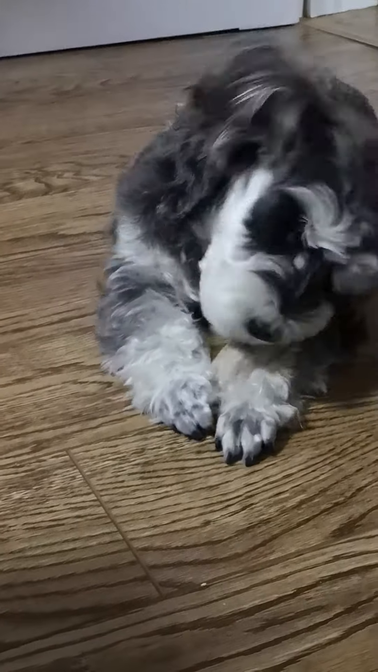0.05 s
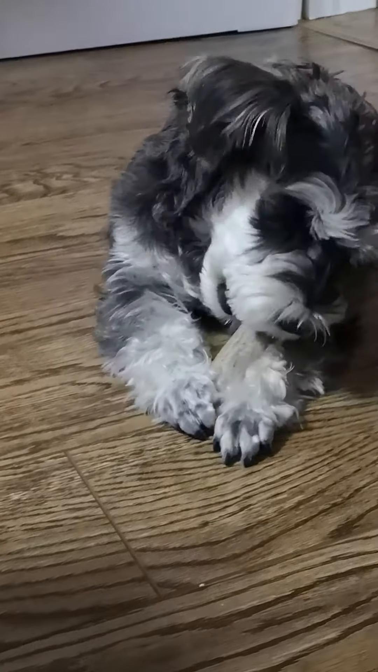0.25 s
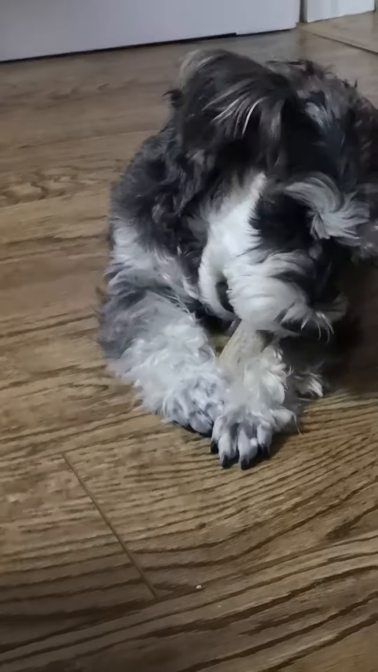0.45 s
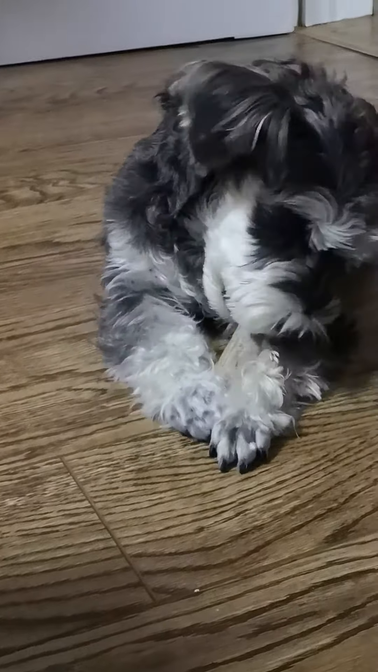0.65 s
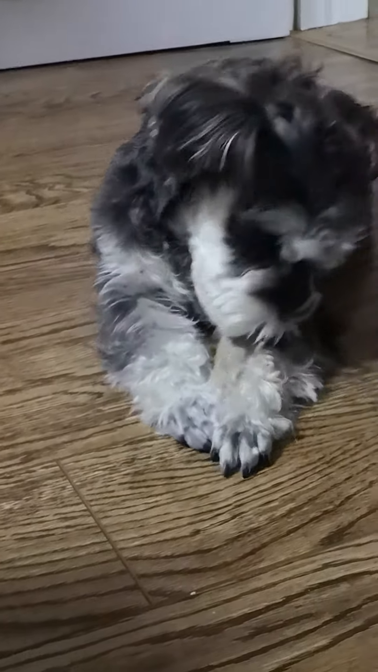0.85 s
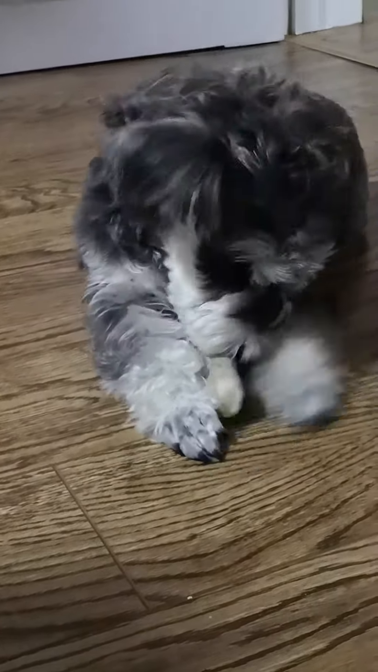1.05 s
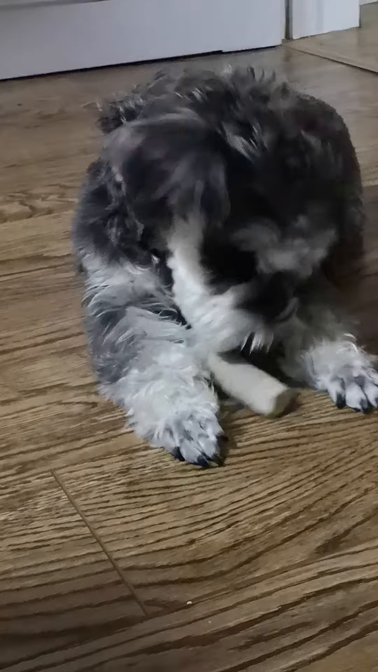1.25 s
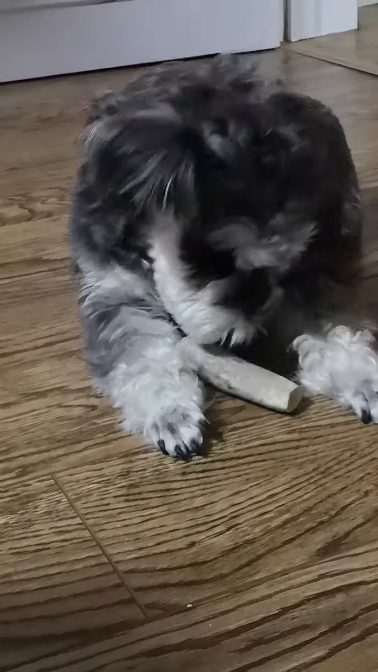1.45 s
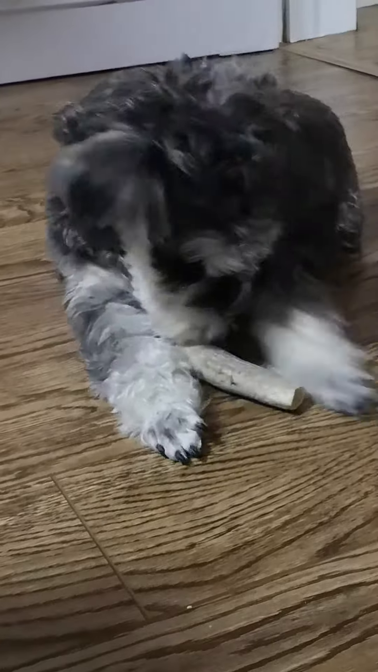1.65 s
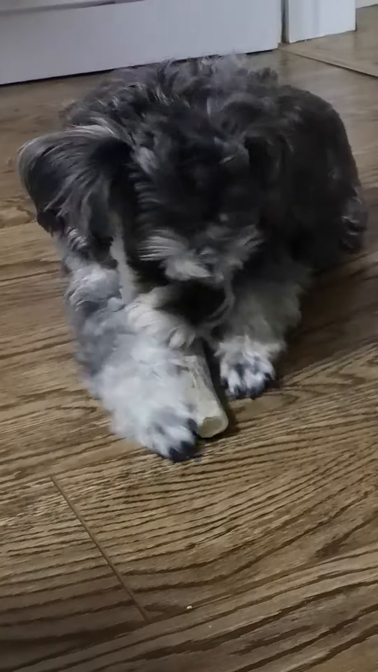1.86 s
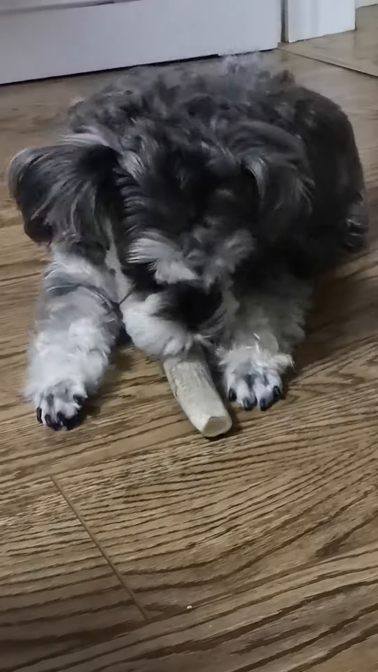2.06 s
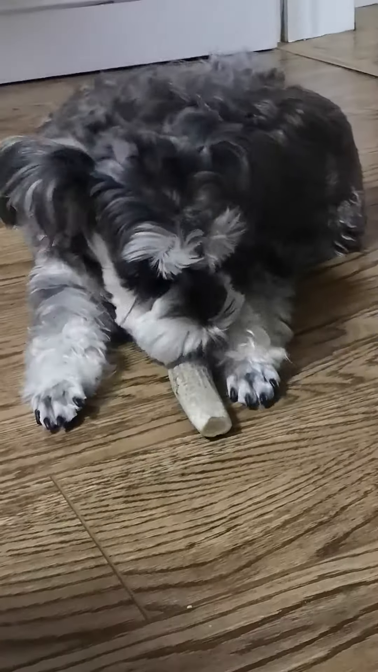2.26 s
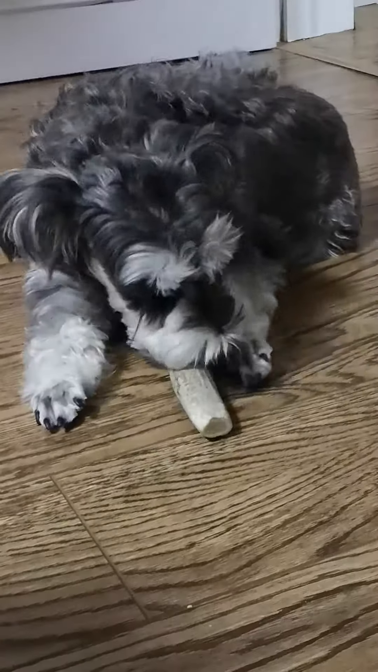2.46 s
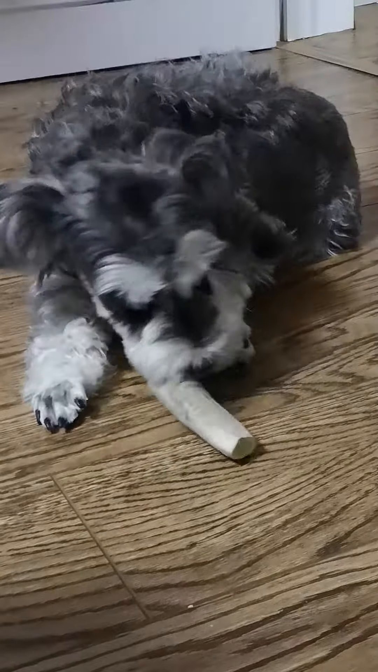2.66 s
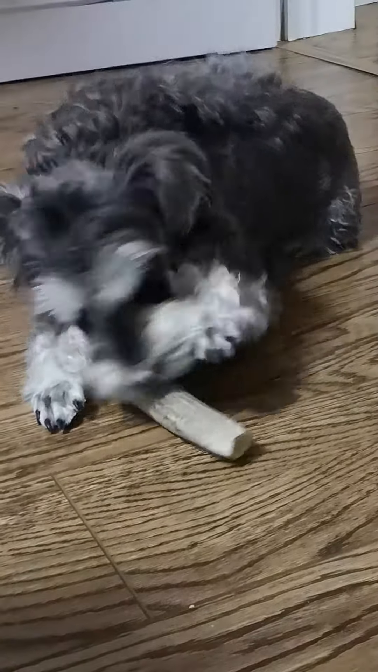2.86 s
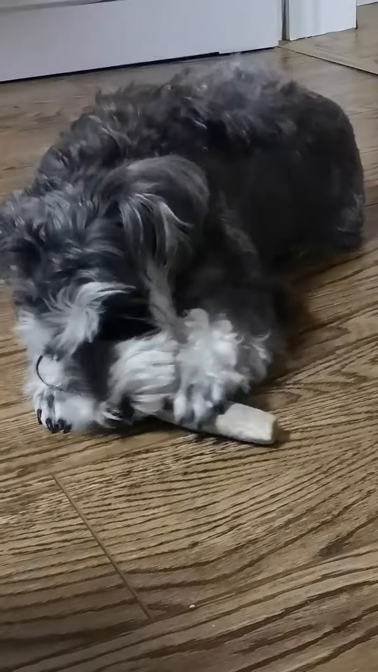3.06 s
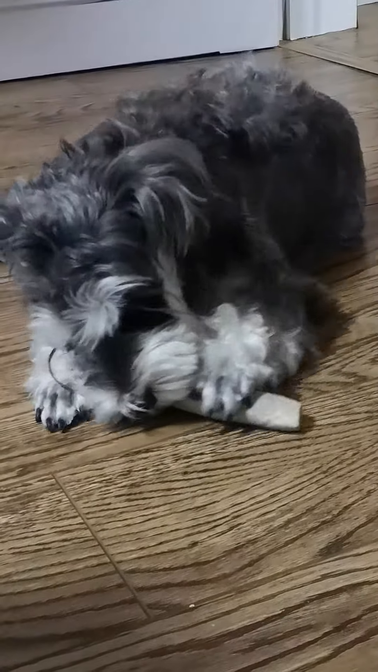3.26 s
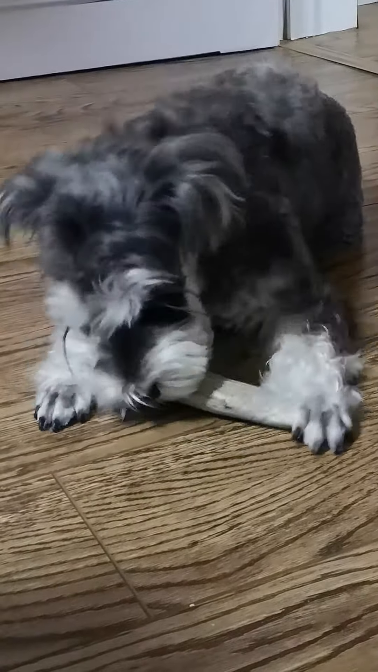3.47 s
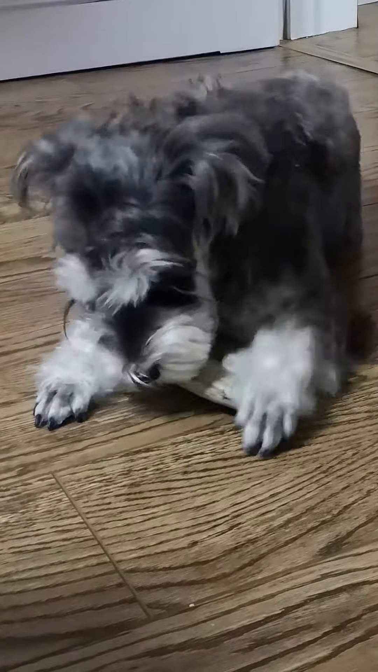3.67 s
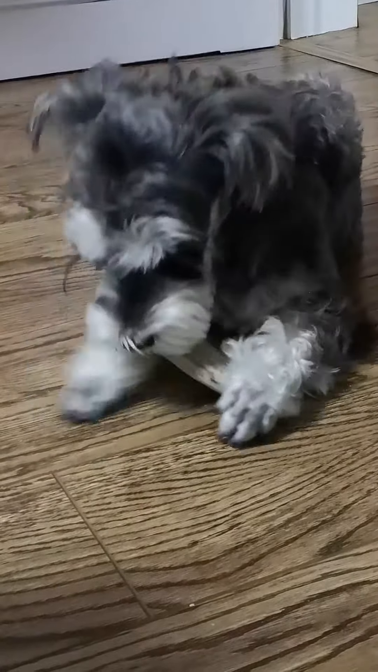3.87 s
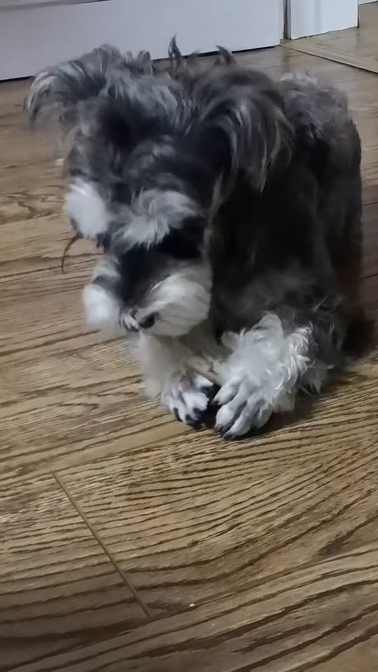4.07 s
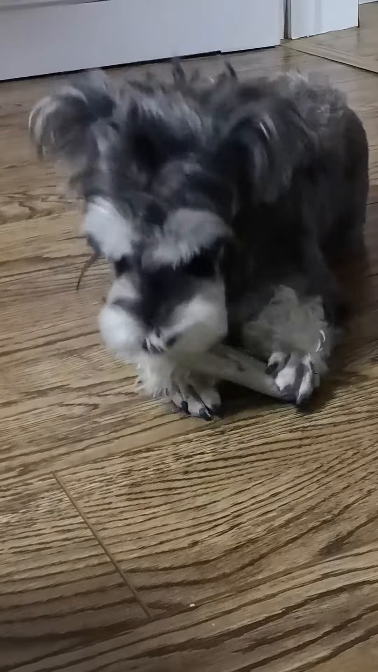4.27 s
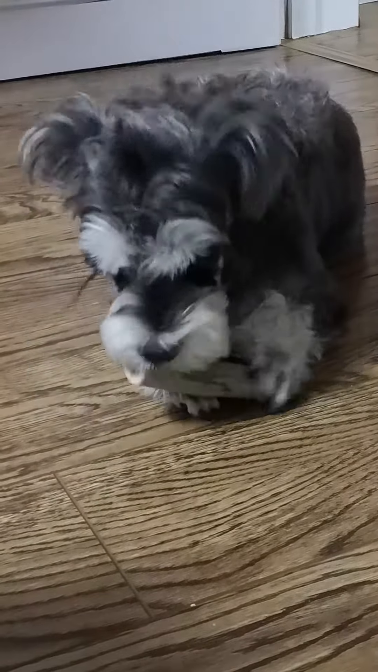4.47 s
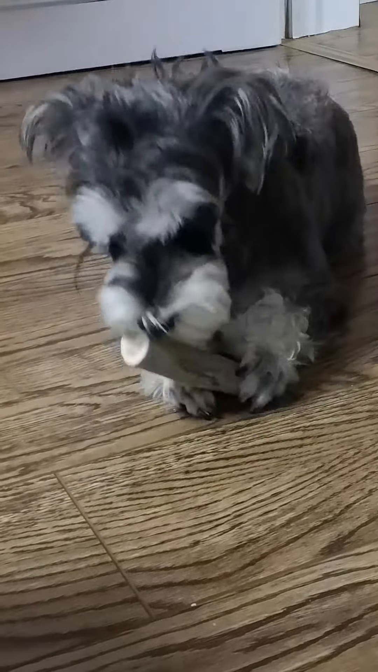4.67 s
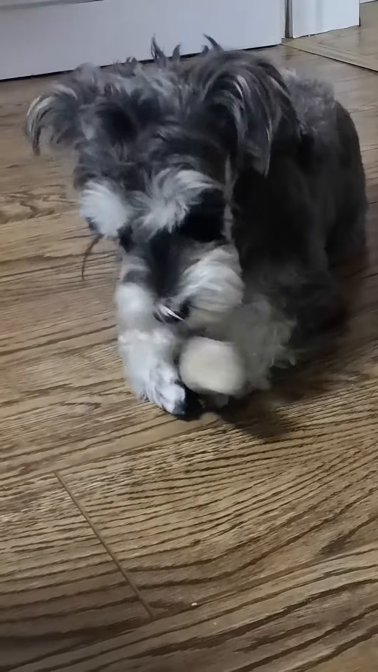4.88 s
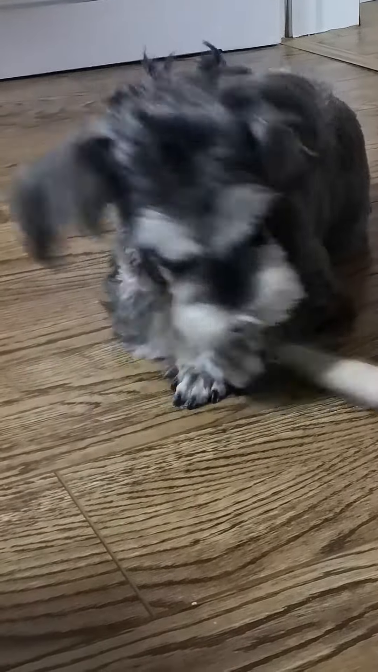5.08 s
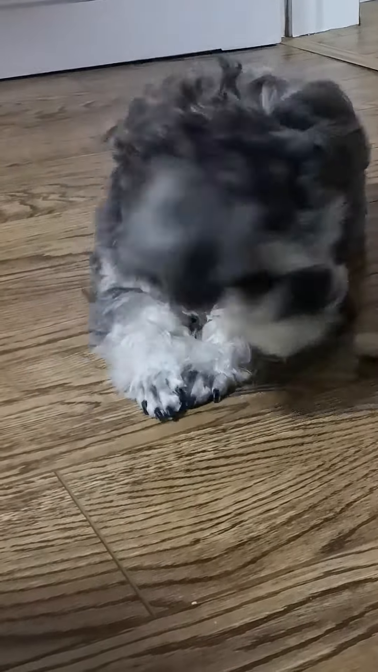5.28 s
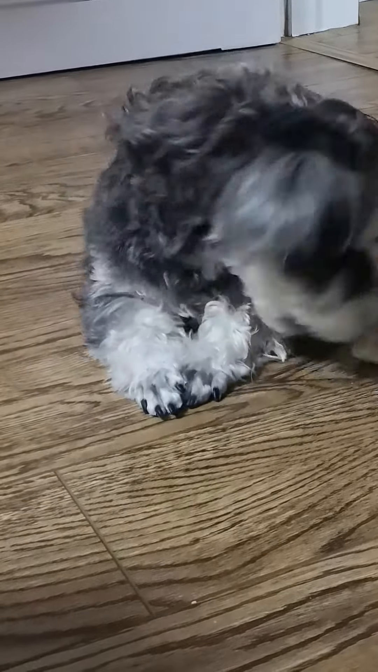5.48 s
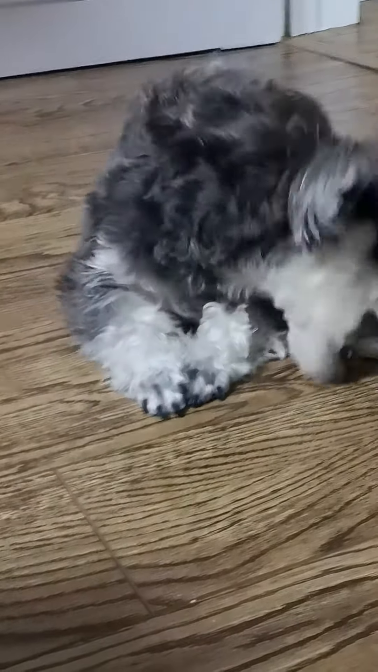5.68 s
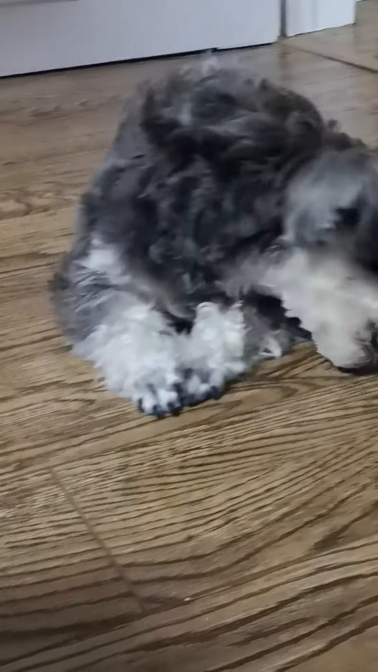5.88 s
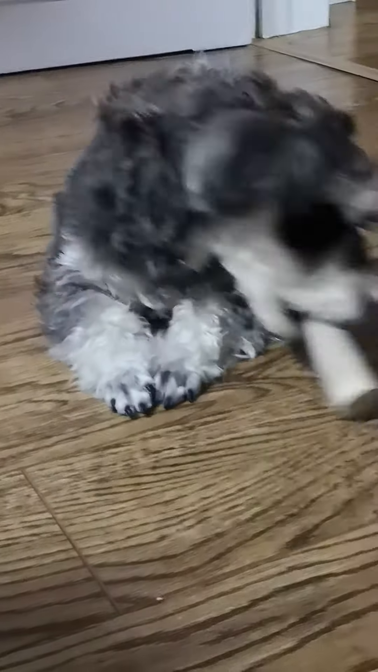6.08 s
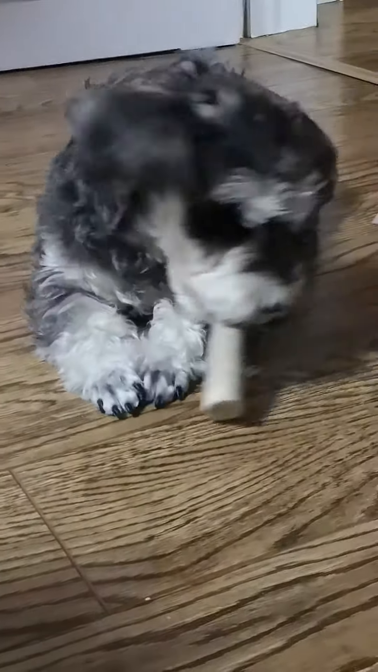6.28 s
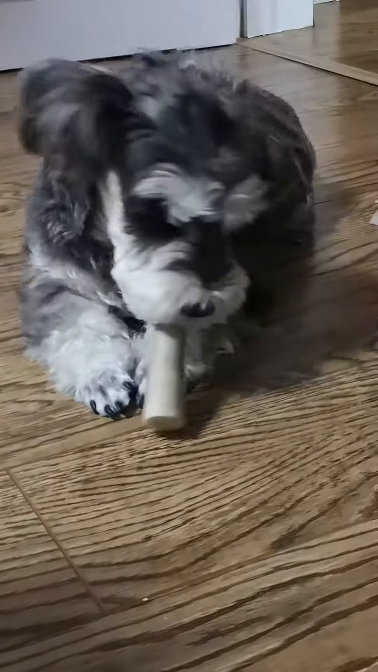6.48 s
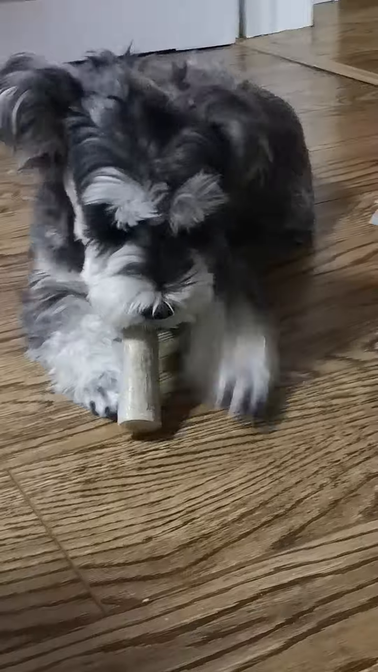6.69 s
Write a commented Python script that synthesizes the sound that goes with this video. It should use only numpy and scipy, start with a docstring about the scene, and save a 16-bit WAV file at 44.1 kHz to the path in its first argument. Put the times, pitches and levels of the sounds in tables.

```python
"""A small dog works at a piece of antler on the plank floor of a still living room.
From the start the held antler knocks and slides on the boards, and teeth soon crack against it;
each blow is a filtered impulse with ringing modes, each slide a train of tiny blows.
Later fur and paws brush the floor as shaped noise, and shifts of weight boom as short low tones.
After five seconds the antler falls free and bounces, then slides and weak knocks end the scene."""
import sys
import numpy as np
from scipy import signal
from scipy.fft import rfft, irfft, next_fast_len
from scipy.io import wavfile

SR = 44100
rng = np.random.default_rng(int(sys.argv[2]) if len(sys.argv) > 2 else 0)


def unload_wav(signal):
    """Save mono or channel-first audio to the path in sys.argv[1] as 16-bit WAV at rate SR, clipped to [-1, 1]."""
    wavfile.write(
        sys.argv[1],
        SR,
        np.round(np.clip(np.atleast_2d(signal).T, -1, 1) * 32767).astype(np.int16),
    )


N = 297217   # samples in the scene
RING = 16384   # samples that one contact may ring

# Spectrum of the still room: [frequency_hz, density_db]
HUSH_SPECTRUM = [(12, -42.5), (20, 6), (109, -13), (219, -17), (274, -24.5), (333, -16), (725, -25.5),
                 (834, -27), (1770, -25), (15500, -46)]
HUSH_DB = -62
# Decay time of the late reverberation: [frequency_hz, t60_s]
ROOM_DECAY = [(150, 0.6), (400, 0.33), (1000, 0.37), (2000, 0.16), (5000, 0.38), (12000, 0.16)]
# Colour of all reflections: [frequency_hz, gain_db]
ROOM_GAIN = [(100, -8), (350, 1.5), (900, -3.5), (2000, -1), (5000, -6.5), (12000, -0.5)]
# Likeness of diffuse sound at the two ports: [frequency_hz, correlation]
PORT_CORRELATION = [(100, 0.95), (300, 0.88), (520, -0.42), (800, -0.31), (1500, 0.084), (4000, -0.019)]
# Level difference of the microphone ports: [frequency_hz, left_minus_right_db]
PORT_BALANCE = [(300, 0), (520, 0), (1100, 0.5), (2000, 2.5), (4000, 2.5), (8000, 4), (12000, -2)]
CUTOFF_HZ = 15750

# The dog's weight shifts on the floor: [start_s, length_s, level_db, pitch_hz]
WEIGHT_SHIFTS = [(3.795, 0.15, -57.5, 55), (3.798, 0.086, -56, 98.5), (5.696, 0.19, -51.5, 96)]
# Fur and paws brush the boards: [start_s, length_s, level_db, hiss_centre_hz]
FUR_STROKES = [(1.764, .27, -63.5, 8560), (3.317, .2, -67.5, 1180), (3.921, 0.14, -63, 3700),
               (6.09, 0.21, -64.5, 3550)]
# Spectrum of hair on wood: [frequency_hz, density_db]
FUR_SPECTRUM = [(300, 9), (1000, 5), (2500, 1.5), (4500, -7.5), (5700, -1), (7000, -12.5), (12000, -13),
                (15000, -30)]

# The antler slides over the grain: [start_s, length_s, level_db]
ANTLER_SLIDES = [(.02, 0.15, -62), (1.143, 0.048, -53), (1.424, 0.061, -41.5), (1.875, .15, -46),
                 (2.711, 0.087, -46.5), (2.831, 0.058, -55), (3.201, 0.041, -56), (3.557, 0.067, -57),
                 (4.263, 0.13, -56), (4.438, 0.055, -45.5), (4.586, 0.04, -60.5), (4.889, 0.071, -60),
                 (5.52, .042, -50), (5.722, 0.065, -56.5), (5.869, 0.034, -45), (5.927, 0.043, -44.5),
                 (6.09, 0.26, -57.5), (6.269, 0.23, -54), (6.553, .13, -64.5)]
# Brightness of a middling slide; harder pressure is brighter
SLIDE_HZ, SLIDE_REF_DB, SLIDE_DB_PER_OCTAVE = 990, -52.5, 18
# Polished antler hisses on the varnish: level below a middling rasp, and centre
SLIDE_HISS_DB, SLIDE_HISS_HZ = -24, 5440
HISS_DB_PER_DB, HISS_LASTS = 1.49, 1.5   # growth with pressure; length relative to the slide

# Teeth snap on to the antler: [start_s, level_db, hardness_hz, mouth_hz, opposite_tooth_db]
TOOTH_SNAPS = [(.116, -42.5, 2460, 2630, -2.5), (0.2491, -39.5, 2140, 1550, 0),
               (1.5167, -28, 4500, 3640, -21), (2.289, -50.5, 11830, 8550, -6),
               (2.956, -47.5, 6500, 1700, 0), (3.5303, -25, 7450, 3070, 3), (3.7972, -17, 8300, 3960, -5.5),
               (4.6986, -28, 8900, 4280, -13), (5.3826, -25, 6100, 3550, -14)]
JAW_GAP_S = .0042   # the opposite tooth lands this much later
# Answer of antler and jaw to a tooth: [frequency_hz, gain_db]
TOOTH_SPECTRUM = [(200, -8.5), (900, -16.5), (1400, -8.5), (2000, -1.5), (3200, -6.5), (4300, -6.5),
                  (6000, -1), (9000, -5.5), (12000, -4.5), (15000, -21.5)]

# The held antler meets the floor: [start_s, level_db]
HELD_KNOCKS = [(.001, -32.5), (.675, -43), (1.0651, -29), (1.1323, -27), (1.154, -31), (1.356, -39),
               (1.3913, -28), (1.4203, -22), (1.426, -28), (1.4538, -26), (1.512, -31.5), (1.5841, -31),
               (1.6308, -42), (1.858, -35), (1.9112, -25.5), (1.938, -28), (1.965, -30.5), (2.0011, -27.5),
               (2.067, -27.5), (2.1248, -38), (2.5665, -40.5), (2.6158, -34.5), (2.675, -31),
               (2.707, -24.5), (2.8472, -30.5), (2.858, -36), (3.072, -36.5), (3.1737, -36),
               (3.2614, -33.5), (4.2123, -43), (4.409, -30), (4.4545, -27), (5.5193, -34.5), (5.533, -33.5),
               (5.732, -38.5), (5.8451, -39.5), (5.863, -35), (5.893, -32), (6.043, -37), (6.4002, -39)]
# Contact hardness at a middling blow; stronger blows are harder
KNOCK_HZ, KNOCK_REF_DB, KNOCK_DB_PER_OCTAVE = 842, -30, 46.5
# Once the dog has the antler up in its jaws, the bare end lands harder
LIFT_S, LIFTED_OCTAVES = 4.0, 0.43
# After a knock the antler rocks back on to the board, later and weaker
ROCK_SHORTEST_S, ROCK_LONGEST_S, ROCK_LOSS_DB = 0.01493, .05, 15.5
# Answer of the boards to the held antler: [frequency_hz, gain_db]
BOARD_SPECTRUM = [(60, -12.5), (150, -8), (320, 9.5), (450, 0.5), (620, 4.5), (900, 1), (1400, -2),
                  (2500, -1.5), (3600, -8), (5600, -15.5), (8000, -19.5), (15000, -22)]
# Ringing of the boards: [frequency_hz, relative_level_db, t60_s]
BOARD_MODES = [(175, -35, .1), (215, -28, .14), (303, -31, .16), (360, -24, .08), (418, -19, .08),
               (479, -27, .11), (800, -26, .03), (1017, -24, .03)]

# The free antler falls and bounces: [start_s, level_db, hardness_hz]
FREE_BOUNCES = [(5.1252, -1.5, 4290), (5.175, -2.5, 2400), (5.1848, -9.5, 2770), (5.2204, -16, 1446),
                (5.2279, -2.5, 3300), (5.927, -14.5, 1570)]
# The far end follows: delay, how much weaker, share of the hardness
SLAP_S, SLAP_LOSS_DB, SLAP_HARDNESS = .0032, 13.5, .65
# Answer of the free antler: [frequency_hz, gain_db]
CLACK_SPECTRUM = [(60, -36), (200, -32), (400, 9.5), (900, -2), (1500, 6), (2000, 4.5), (2800, 0),
                  (3600, -4.5), (4500, -14), (5500, -3.5), (6300, -11), (10000, -22), (15000, -33.5)]
# Ringing of the antler: [frequency_hz, relative_level_db, t60_s]
HORN_MODES = [(1249, -30, .05), (1585, -24, .035), (1856, -27, .04), (2320, -26, .04), (2596, -25, .04),
              (4010, -27, .03), (5450, -33, .03)]


def from_db(db):
    """Logarithmic level: decibels become an amplitude ratio."""
    return 10 ** (np.asarray(db) / 20)


def rms_one(x):
    """Normalisation of power: the root mean square becomes one."""
    return x / np.sqrt(np.mean(x ** 2) + 1e-20)


def at_hz(points, hz):
    """Logarithmic frequency scale: interpolates a table by equal ratios."""
    f, value = np.transpose(points)
    return np.interp(np.log(np.maximum(hz, 1)), np.log(f), value)


def add(track, s, sound):
    """Superposition: adds a sound to a track at time s."""
    at = max(round(s * SR), 0)
    track[at:at + len(sound)] += sound[:len(track) - at]


def low_pass(x, hz, order):
    """Butterworth attenuation of the treble."""
    sos = signal.butter(order, min(hz, .45 * SR), fs=SR, output="sos")
    return signal.sosfilt(sos, x + 1e-18)


def colour(x, gain_at):
    """Linear filtering: multiplies the spectrum by a smooth gain over frequency."""
    size = next_fast_len(x.shape[-1] + 2048)
    gain = gain_at(np.fft.rfftfreq(size, 1 / SR))
    return irfft(rfft(x, size) * gain, size)[..., :x.shape[-1]]


def resonate(x, hz, q, boost_db):
    """Resonance: adds the output of one band-pass peak to the sound."""
    b, a = signal.iirpeak(min(hz, .4 * SR), max(q, 1), fs=SR)
    return x + from_db(boost_db) * signal.lfilter(b, a, x)


def disperse(x, hz):
    """Dispersion: bending waves carry the treble ahead of the bass."""
    c = np.exp(-2 * np.pi * hz / SR)
    return signal.lfilter([-c, 1], [1, -c], x)


def scatter(x, seconds, bounce):
    """Multiple reflection: all-pass loops in the struck piece spread a click into a burst."""
    g = np.clip(bounce, 0, .9)
    lags = np.geomspace(.15, 1, 4) * rng.uniform(.8, 1.2, 4) * seconds * SR
    for lag in lags:
        loop = np.r_[1, np.zeros(int(lag)), g]
        x = signal.lfilter(loop[::-1], loop, x + 1e-18)
    return x


def body(spectrum, modes, vary_db, muted_db=0):
    """Modal response: a minimum-phase click and decaying modes, varied at each contact point."""
    variation = rng.normal(0, vary_db, len(spectrum))
    here = np.array(spectrum) + np.outer(variation, [0, 1])
    magnitude = from_db(at_hz(here, np.fft.rfftfreq(RING, 1 / SR)))
    cepstrum = irfft(np.log(magnitude))
    causal = np.r_[cepstrum[0], 2 * cepstrum[1:RING // 2]]   # folding gives minimum phase
    click = irfft(np.exp(rfft(causal, RING)))
    t = np.arange(RING) / SR
    rings = np.zeros(RING)
    for hz, db, t60 in modes:
        decay = from_db(db + rng.normal(0, vary_db) - 60 * t / t60)
        rings += decay * np.cos(2 * np.pi * hz * t)
    return click + from_db(-18 - muted_db) * rings   # steady pressure on the piece mutes its ringing


def at_level(x, db, crest_s):
    """Energy of a blow: that of a constant amplitude at this level lasting crest_s."""
    return from_db(db) * x * np.sqrt(crest_s * SR / np.sum(x ** 2))


def swell(length):
    """Half-sine envelope: the rise and fall of one movement."""
    return np.sin(np.linspace(0, np.pi, max(round(length * SR), 8)))


def diffuse(size):
    """Diffuse field: white noise whose correlation between two ports depends on frequency."""
    mid, side = rng.standard_normal((2, size))

    def alike(hz):
        return np.clip(at_hz(PORT_CORRELATION, hz), -.99, .99)

    common = colour(mid, lambda hz: np.sqrt(1 + alike(hz)))
    opposed = colour(side, lambda hz: np.sqrt(1 - alike(hz)))
    return common + opposed * [[1], [-1]]


def hush():
    """Ambient noise: a steady diffuse field with the spectrum of the still room."""
    noise = colour(diffuse(N), lambda hz: from_db(at_hz(HUSH_SPECTRUM, hz)))
    return from_db(HUSH_DB) * rms_one(noise)


def room_answer(near_db, near_t60, far_db, gap_s):
    """Reverberation: quick reflections from door and furniture, then a tail that dies by bands."""
    t = np.arange(2 * RING) / SR
    centres = np.geomspace(125, 16000, 8)
    noise, tail = diffuse(len(t)), 0
    for hz, share in zip(centres, np.eye(len(centres))):
        band = colour(noise, lambda f: at_hz(np.c_[centres, share], f))
        tail = tail + band * from_db(-60 * t / at_hz(ROOM_DECAY, hz))
    near = diffuse(len(t)) * from_db(-60 * t / near_t60)
    both = (from_db(near_db) * rms_one(near) + from_db(far_db) * rms_one(tail)) / np.sqrt(len(t))
    onset = np.clip(t / gap_s - .5, 0, 1)   # silent before half the gap, full after one and a half
    return colour(both, lambda hz: from_db(at_hz(ROOM_GAIN, hz))) * onset


def in_room(x, move_s, **room):
    """Direct and reflected sound: left leads, and the reflections change as the source moves about."""
    turn = 2 * np.pi * np.arange(N) / SR / move_s
    wet = 0
    for share in (np.cos(turn), np.sin(turn)):
        wet = wet + signal.fftconvolve((x * share)[None], room_answer(**room), axes=1)[:, :N]
    direct = np.array([x, np.r_[0, 0, x[:-2]]])   # right is two samples late
    return direct + wet


def thuds():
    """Forced vibration: a slow push makes the whole floor boom briefly."""
    out = np.zeros(N)
    for s, length, db, hz in WEIGHT_SHIFTS:
        push = swell(length)
        boom = push * np.sin(2 * np.pi * hz * np.arange(len(push)) / SR)
        add(out, s, from_db(db) * rms_one(boom))
    return out


def hissing_strokes():
    """Friction: fur, paws and every slide hiss, as (start_s, length_s, level_db, centre_hz)."""
    strokes = list(FUR_STROKES)
    for s, length, db in ANTLER_SLIDES:
        hiss_db = SLIDE_REF_DB + SLIDE_HISS_DB + HISS_DB_PER_DB * (db - SLIDE_REF_DB)
        strokes.append((s, HISS_LASTS * length, hiss_db, SLIDE_HISS_HZ))
    return strokes


def brushes():
    """Friction noise: hair or polished antler on wood hisses under each movement."""
    out = np.zeros(N)
    for s, length, db, centre_hz in hissing_strokes():
        pressure = swell(length)[:RING]
        hiss = colour(rng.standard_normal(RING), lambda hz: from_db(at_hz(FUR_SPECTRUM, hz)))
        hiss = low_pass(hiss, 1.4 * centre_hz, order=1)   # a soft pad rubs duller than hair
        hiss = rms_one(resonate(hiss, centre_hz, q=1.7, boost_db=10.0))
        add(out, s, from_db(db) * pressure * hiss[:len(pressure)])
    return out


def slides(catches_per_s, uneven_db):
    """Stick-slip: the antler catches on the wood grain in many tiny, uneven blows."""
    out = np.zeros(N)
    for s, length, db in ANTLER_SLIDES:
        bright_hz = SLIDE_HZ * 2 ** ((db - SLIDE_REF_DB) / SLIDE_DB_PER_OCTAVE)
        stroke = swell(length)[:RING]
        chance = rng.random(RING)[:len(stroke)]
        size = rng.standard_normal(RING)[:len(stroke)]
        strength = from_db(uneven_db * np.minimum(np.abs(size), 2))
        catches = (chance < catches_per_s / SR) * np.sign(size) * strength
        pressed = body(BOARD_SPECTRUM, BOARD_MODES, vary_db=2.5, muted_db=4.5)
        rasp = low_pass(signal.fftconvolve(catches * stroke, pressed), bright_hz, order=1)
        rasp = low_pass(rasp, 1900, order=1)   # the varnish rounds every catch
        add(out, s, from_db(db) * rasp * np.sqrt(len(stroke) / (np.sum(rasp ** 2) + 1e-20)))
    return out


def tooth_contacts():
    """Paired impact: each jaw snaps once, as (start_s, level_db, hardness_hz, mouth_hz)."""
    contacts = []
    for s, db, hard_hz, mouth_hz, opposite_db in TOOTH_SNAPS:
        contacts.append((s, db, hard_hz, mouth_hz))
        contacts.append((s + JAW_GAP_S, db + opposite_db, hard_hz, mouth_hz))
    return contacts


def bites():
    """Cavity resonance: a tooth snaps on to the antler and the open mouth colours the crack."""
    out = np.zeros(N)
    for s, db, hard_hz, mouth_hz in tooth_contacts():
        response = body(TOOTH_SPECTRUM, HORN_MODES, vary_db=3.5, muted_db=12.0)
        crack = scatter(response, seconds=0.0004, bounce=0.82)
        hit = resonate(crack, mouth_hz, q=4.4, boost_db=10.5)
        add(out, s, at_level(low_pass(hit, hard_hz, order=2), db, crest_s=0.00023))
    return out


def held_contacts():
    """Contact stiffness: strength and grip set the hardness, as (start_s, level_db, hardness_hz)."""
    contacts = []
    for s, db in HELD_KNOCKS:
        rock_s = rng.uniform(ROCK_SHORTEST_S, ROCK_LONGEST_S)
        for at, level in ((s, db), (s + rock_s, db - ROCK_LOSS_DB)):
            octaves = (level - KNOCK_REF_DB) / KNOCK_DB_PER_OCTAVE + LIFTED_OCTAVES * (s > LIFT_S)
            contacts.append((at, level, KNOCK_HZ * 2 ** octaves))
    return contacts


def knocks(grit_db, grit_db_per_octave, grit_hz):
    """Contact time: a soft blow only wakes the low modes; a harder one also crushes grit."""
    out = np.zeros(N)
    for s, db, hard_hz in held_contacts():
        response = body(BOARD_SPECTRUM, BOARD_MODES, vary_db=1.0)
        thock = -disperse(low_pass(response, hard_hz, order=5), hz=117)
        grit = low_pass(scatter(response, seconds=0.0017, bounce=0.56), grit_hz, order=1)
        crush = from_db(grit_db + grit_db_per_octave * min(np.log2(hard_hz / 900), .5))
        add(out, s, at_level(thock + crush * grit, db, crest_s=0.0011))
    return out


def free_contacts():
    """Rigid-body impact: one end lands, the other slaps, as (start_s, level_db, hardness_hz)."""
    slaps = [(s + SLAP_S, db - SLAP_LOSS_DB, hz * SLAP_HARDNESS) for s, db, hz in FREE_BOUNCES]
    return list(FREE_BOUNCES) + slaps


def drop(tick_db, tick_hz):
    """Free impact: the antler lands with a sharp tick, rings in its own modes and wakes the boards."""
    out = np.zeros(N)
    for s, db, hard_hz in free_contacts():
        antler = body(CLACK_SPECTRUM, HORN_MODES, vary_db=3.5)
        boards = body(BOARD_SPECTRUM, BOARD_MODES, vary_db=2.0)
        response = antler + from_db(-2.0) * boards
        clack = scatter(disperse(response, hz=438), seconds=.0005, bounce=0.78)
        clack = low_pass(clack, hard_hz, order=2)
        treble = response - low_pass(response, tick_hz, order=1)
        tick = low_pass(treble, 2 * hard_hz, order=1)
        tick = low_pass(tick, 12000, order=3)   # the contact is never infinitely short
        add(out, s, at_level(clack + from_db(tick_db) * tick, db, crest_s=0.00031))
    return out


def scene():
    """Superposition of the floor sounds, the falling antler, the teeth and the still room."""
    held = knocks(grit_db=-16.5, grit_db_per_octave=29.0, grit_hz=3240)
    held = held + slides(catches_per_s=690, uneven_db=7) + brushes()
    floor = in_room(held, move_s=.6, near_db=2.5, near_t60=0.13, far_db=-11.5, gap_s=0.0011)
    fall = drop(tick_db=-3, tick_hz=5000)
    fall = in_room(fall, move_s=.27, near_db=-5.5, near_t60=0.34, far_db=-0.5, gap_s=0.00059)
    teeth = in_room(bites(), move_s=1.103, near_db=0.5, near_t60=0.22, far_db=-3, gap_s=0.00054)
    teeth = teeth * from_db(np.array([[1.2], [-1.2]]))   # louder on the left
    return floor + fall + teeth + thuds() + hush()


def record(dry):
    """Port response: the level difference varies with frequency, and an elliptic filter cuts the top."""
    halves = np.array([[.5], [-.5]])   # each port takes half of the difference
    ports = colour(dry, lambda hz: from_db(at_hz(PORT_BALANCE, hz) * halves))
    return signal.sosfilt(signal.ellip(10, .1, 80, CUTOFF_HZ, fs=SR, output="sos"), ports)


dry = scene()
out = record(dry)
unload_wav(out)
```